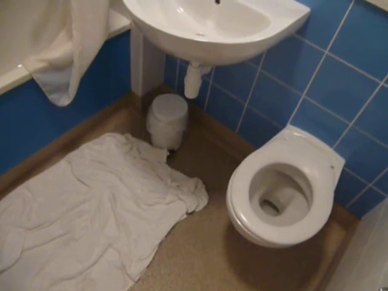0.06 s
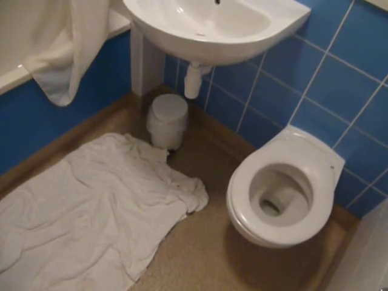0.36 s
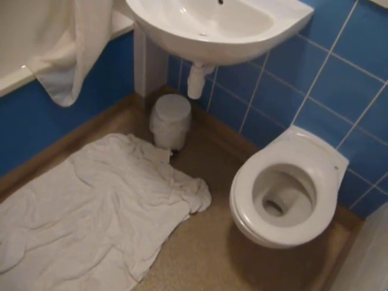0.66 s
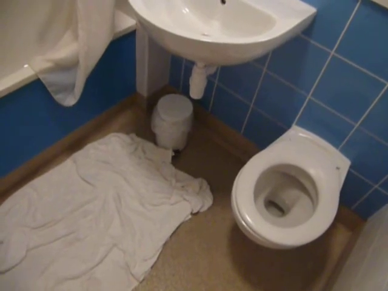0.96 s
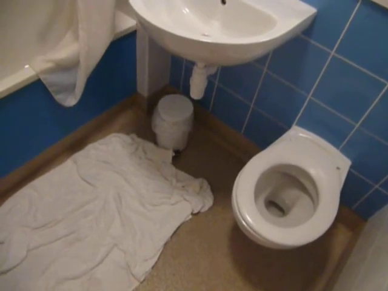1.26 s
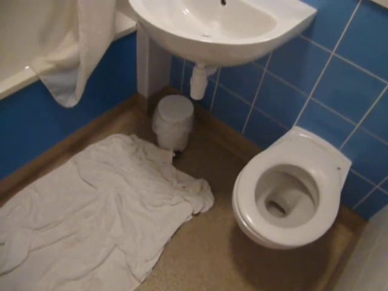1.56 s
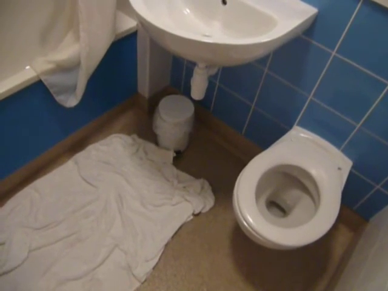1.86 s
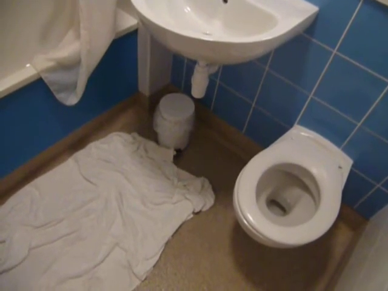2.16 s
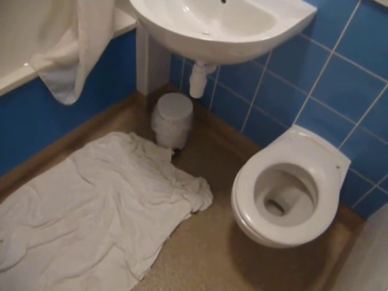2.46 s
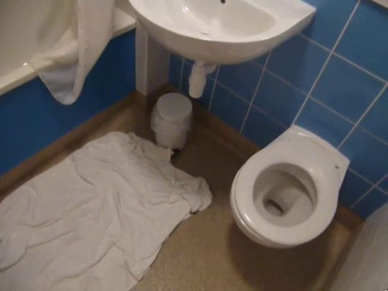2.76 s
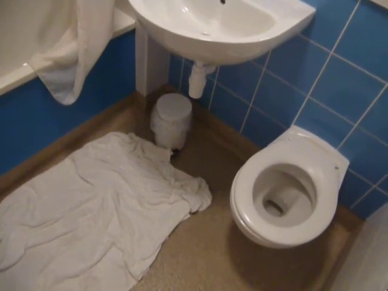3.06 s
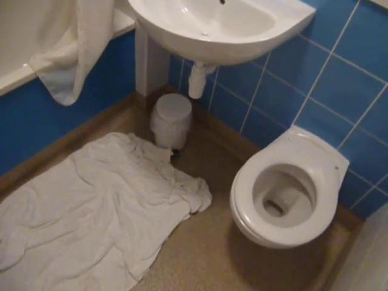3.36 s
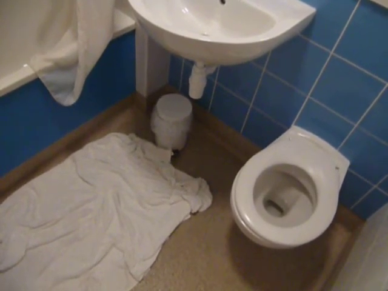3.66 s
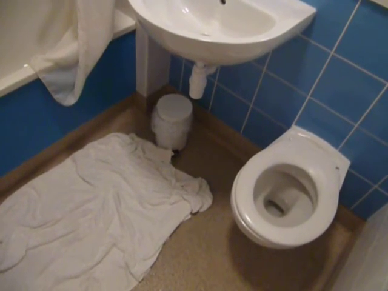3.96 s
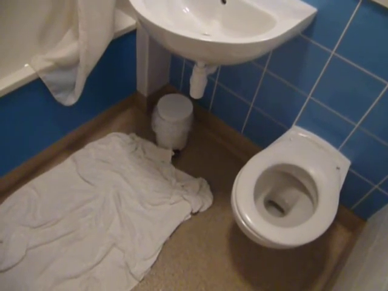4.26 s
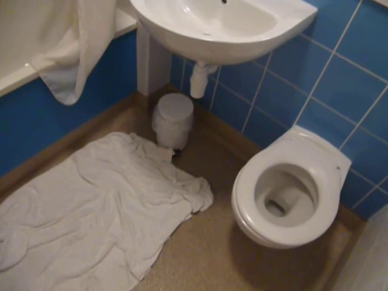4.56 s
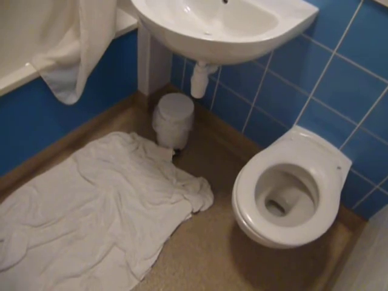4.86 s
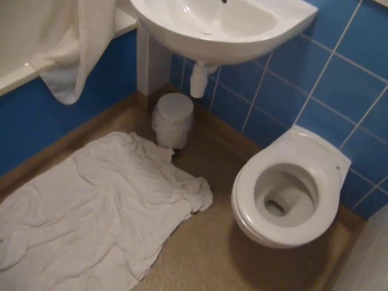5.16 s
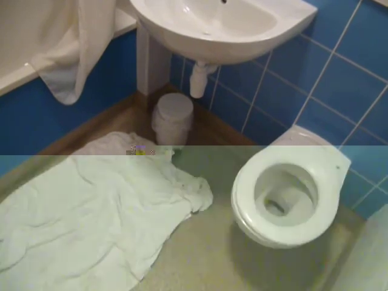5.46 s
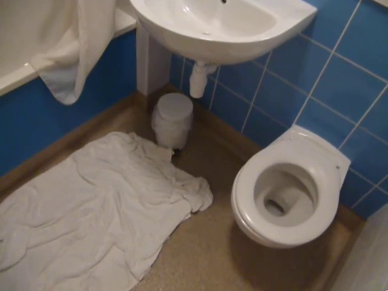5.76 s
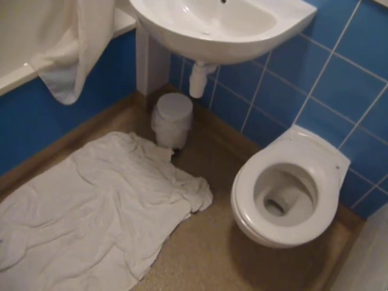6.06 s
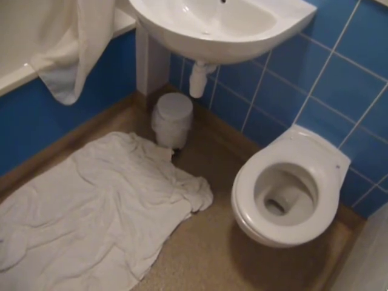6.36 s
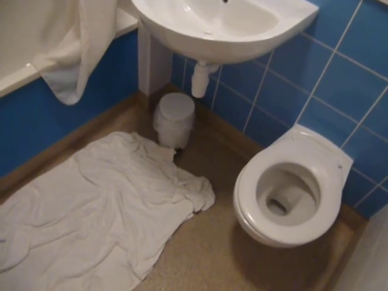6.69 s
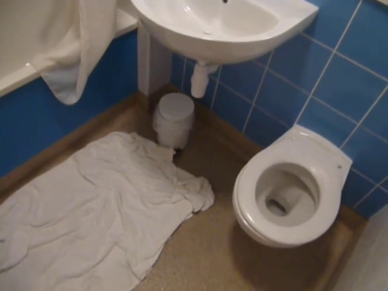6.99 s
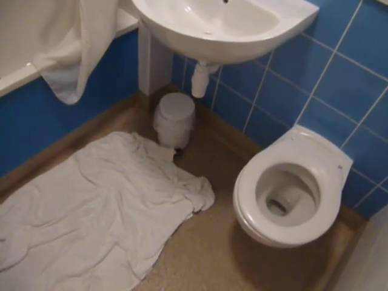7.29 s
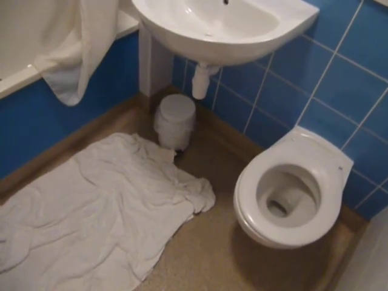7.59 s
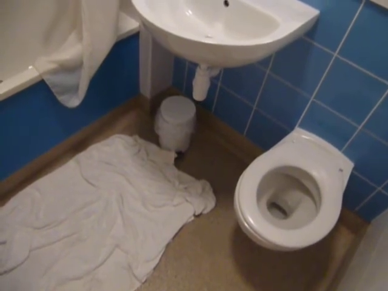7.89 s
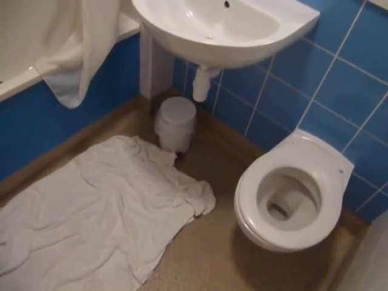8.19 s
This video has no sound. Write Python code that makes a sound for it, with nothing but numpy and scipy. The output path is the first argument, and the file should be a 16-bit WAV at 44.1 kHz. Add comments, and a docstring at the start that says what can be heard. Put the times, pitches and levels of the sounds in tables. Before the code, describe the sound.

In a small tiled bathroom, a pipe behind the wall gives a loud, steady low drone as the toilet cistern refills. It throbs gently and carries a buzz of overtones, with a light rattle and a faint hiss of water beneath. Near the end the buzz changes colour slightly and steadies while the drone goes on. One microphone picks it up inside the room.

```python
"""Chattering cistern valve

Heard from inside a small tiled bathroom: behind the wall, a water valve chatters about 80 times a
second as the toilet cistern refills. The pipe drones with a slow throb, buzzes and rattles in its
clips; the valve ticks and water hisses through it, over a faint hum. Near 7 s the valve settles into
a slightly slower stroke with other overtones."""
import sys
import numpy as np
from scipy import signal
from scipy.fft import rfft, irfft, next_fast_len
from scipy.io import wavfile
from scipy.ndimage import map_coordinates

SR = 44100
rng = np.random.default_rng(int(sys.argv[2]) if len(sys.argv) > 2 else 0)


def bounce(signal):
    """Save signal as a 16-bit WAV file at the path given by the first command-line argument."""
    frames = np.transpose(np.atleast_2d(signal))
    limited = np.clip(frames, -1, 1)
    pcm = np.round(limited * 32767).astype(np.int16)
    wavfile.write(sys.argv[1], SR, pcm)


N = 371763
TIME_S = np.arange(N) / SR

# The drone's two lowest partials. Each row: time in seconds, first and second level in dB before trim.
LOW_PARTIAL_LEVELS = [(0.1, -23.5, -24), (0.35, -24.5, -25), (1.46, -23, -24), (1.71, -25.5, -25.5),
                      (2.1, -24.5, -23.5), (2.55, -24.5, -26), (2.75, -24, -22.5), (5.16, -25.5, -24),
                      (8.23, -24, -23.5), (8.25, -24, -24.5)]
# The drone's third partial, fading now and then. Each row: time in seconds, level in dB before trim.
THIRD_PARTIAL_LEVELS = [(0.2, -28.5), (0.4, -27.5), (0.49, -38.5), (0.6, -31), (0.92, -32), (1.06, -50),
                        (1.24, -35), (1.51, -38), (1.57, -29), (1.8, -36), (1.98, -28.5), (4.76, -30),
                        (4.96, -36.5), (5.43, -36), (5.68, -30), (5.91, -40), (6.72, -31), (8.3, -34)]
# The pipe's overtones. Each row: multiple of the stroke rate, usual level in dB with the valve loose,
# usual level in dB once it has settled, roughness from 0 to 1 while loose.
PIPE_OVERTONES = [(4, -41.0, -33.5, 0.4), (5, -37.0, -39.5, 0.2), (6, -40.0, -35.5, 0.5),
                  (7, -38.0, -43.5, 0.4), (8, -43.5, -35.0, 0.6), (9, -47.5, -51.5, 0.3),
                  (10, -47.5, -52.5, 0.3), (11, -52.5, -55.0, 0.5), (12, -51.0, -61.5, 0.4),
                  (13, -53.5, -52.0, 0.6), (14, -39.5, -40.5, 0.1), (15, -50.5, -46.5, 0.2),
                  (16, -48.0, -52.0, 0.3), (17, -53.5, -58.0, 0.3), (18, -57.0, -60.5, 0.1),
                  (19, -64.0, -61.0, 0.6), (20, -59.5, -70.5, 0.3), (21, -58.5, -64.0, 0.3),
                  (22, -61.0, -55.5, 0.3), (23, -55.5, -59.5, 0.2), (24, -64.5, -60.0, 0.5),
                  (25, -69.5, -67.0, 0.4), (26, -60.5, -63.5, 0.2), (27, -62.0, -68.5, 0.2),
                  (28, -70.0, -73.0, 0.5), (29, -58.0, -61.5, 0.1), (30, -64.5, -67.0, 0.2),
                  (31, -69.5, -67.0, 0.4), (32, -61.5, -64.0, 0.2), (33, -72, -64, 0.4),
                  (34, -72, -73, 0.4), (35, -67.0, -68.5, 0.4), (36, -73, -78, 0.4),
                  (37, -64.0, -71.0, 0.4), (38, -67.0, -67.0, 0.5), (39, -73.0, -68.0, 0.4),
                  (49, -72.5, -69.5, 0.5), (52, -74.0, -75.5, 0.5), (56, -77.0, -75.5, 0.5),
                  (59, -76.0, -84.0, 0.5), (63, -76.5, -83.0, 0.5), (67, -69.5, -75.0, 0.4),
                  (69, -74.5, -78.5, 0.4)]
# Overtones that swell or sink as the third partial fades. Each row: multiple, dB gained per dB of fade.
OVERTONE_LEAN = [(4, -.9), (5, .75), (6, -.3), (14, .35)]
# Resonances of pipe and wall. Each row: frequency in Hz, nominal width in Hz, relative level in dB.
WALL_MODES = [(172, 22, -0.5), (206, 16, 0), (231.2, 12, -1), (256.6, 16, -2), (288.6, 10, -4.5),
              (303.6, 12, 3), (337.7, 10, -0.5), (371.4, 18, -6), (424, 22, -1), (446, 14, -4.5),
              (486, 21, -7), (567, 36, -6.5), (695, 24, -16.5), (842, 40, -10.5), (877, 24, -9),
              (916, 25, -12.5), (1026, 37, -18), (1105, 25, -12.5), (1220, 36, -18), (1312, 70, -15)]
# Colour of the valve's tick. Each row: frequency in Hz, relative level in dB.
TICK_SPECTRUM = [(2300, -24.5), (2620, 1), (2850, 0), (3200, 0.5), (3500, -4.5), (4000, 2), (4850, -9.5),
                 (5400, 4.5), (6200, -7.5), (6550, -2.5), (7000, -14.5), (8500, -35.5)]
# Colour of the water jet in the valve. Each row: frequency in Hz, relative level in dB.
JET_SPECTRUM = [(20, -15.5), (60, -8.5), (130, -1), (400, -3), (650, -7), (1300, -10.5), (1500, -16),
                (2300, -21.5), (2900, -25.5), (3400, -25), (5500, -28), (6200, -30.5), (6700, -29.5),
                (7600, -36), (8500, -48.5)]

SETTLE_AT_S, SETTLE_TAKES_S = 6.84, 0.22


def valve_stroke(rate_hz=79.68, hurry_hz_per_db=0.035, wander_hz=0.1303, settled_drop_hz=0.42):
    """Phase of the valve: it wanders and hurries a little while loose, then runs slower and steadier."""
    settled = settling()
    hurry = hurry_hz_per_db * third_fade_db() * (1 - settled)
    wander = wander_hz * (1 - 0.5 * settled) * wobble(8)
    return 2 * np.pi * np.cumsum(rate_hz + hurry + wander - settled_drop_hz * settled) / SR


def settling():
    """How far the valve has settled into its slower stroke, from 0 to 1."""
    return np.clip((TIME_S - SETTLE_AT_S) / SETTLE_TAKES_S, 0, 1)


def third_fade_db(limit_db=4):
    """How far the third partial lies under its usual level."""
    third_db, = curves(THIRD_PARTIAL_LEVELS)
    return np.clip(third_db.mean() - third_db, -limit_db, limit_db)


def pipe_drone(stroke, trims_db=(0.2, -0.16, 0.5), throb_hz=6.26, crest_s=0.057):
    """Three strong clean partials; a weaker vibration just under the second beats against it."""
    first_db, second_db = curves(LOW_PARTIAL_LEVELS)
    third_db = curves(THIRD_PARTIAL_LEVELS)[0] + wobble(24)  # flutters by about 1 dB
    beat = 2 * np.pi * throb_hz * (TIME_S - crest_s)
    easing = np.linspace(1, 0.58, N)  # the throb grows shallower
    octave = partial_phase(stroke, 2)
    first = amp(first_db) * (1 + 0.0558 * easing * np.cos(beat)) * np.cos(stroke)
    second = amp(second_db) * (np.cos(octave) + 0.2034 * easing * np.cos(octave - beat))
    third = amp(third_db) * np.cos(partial_phase(stroke, 3))
    return -np.sqrt(2) * sum(amp(db) * wave for db, wave in zip(trims_db, (first, second, third)))


def pipe_buzz(stroke, flutter_per_s=26, dip_db=-3.5, dip_half_width_s=0.1):
    """Overtones flutter as the strokes land unevenly, and less so once the valve has settled."""
    settled, fade_db = settling(), third_fade_db()
    buzz = np.zeros(N)
    for order, loose_db, settled_db, loose_roughness in PIPE_OVERTONES:
        roughness = loose_roughness * (1 - 0.4 * settled)
        scatter = rng.uniform(-np.pi, np.pi) * (order > 8)
        phase = partial_phase(stroke, order) + scatter  # short waves reach the microphone by many paths
        steady = np.sqrt(2 * (1 - roughness ** 2)) * np.cos(phase)
        flutter = wobble(flutter_per_s) * np.cos(phase) + wobble(flutter_per_s) * np.sin(phase)
        level_db = loose_db + settled * (settled_db - loose_db)
        lean_db = dict(OVERTONE_LEAN).get(order, 0) * fade_db
        drift_db = (0.6 + 2.5 * roughness) * (1 - 0.65 * settled) * wobble(6)
        buzz -= amp(level_db + lean_db + drift_db) * (steady + roughness * flutter)
    # the overtones dip while the valve changes its stroke
    dip = np.exp(-((TIME_S - SETTLE_AT_S) / dip_half_width_s) ** 2)
    return buzz * amp(dip_db * dip)


def partial_phase(stroke, order, dispersion=0.7):
    """Bending waves spread on their way along the pipe, so each partial arrives at its own time."""
    return order * stroke - dispersion * order * (order - 1)


def clip_rattle(stroke, level_db=-34, settled_change_db=-1.5, uneven_db=1.6):
    """The pipe knocks unevenly in its clips at every stroke and shakes the wall."""
    swell = np.exp(1.1 * np.cos(stroke - 2.2))  # one crest in every stroke
    knocks = unit(swell * rng.standard_normal(N)) * amp(uneven_db * wobble(14))
    return amp(level_db + settled_change_db * settling()) * ring(knocks, WALL_MODES)


def valve_ticks(stroke, level_db=-59, settled_change_db=-1, uneven_db=2.9, jitter_s=1e-5):
    """Each closing of the valve is a sharp metallic tick; the room blurs them into a fine sizzle."""
    turns = stroke / (2 * np.pi)
    closings = np.interp(np.arange(1, int(turns[-1])), turns, np.arange(N))
    closings += jitter_s * SR * rng.standard_normal(len(closings))
    strength = amp(uneven_db * rng.standard_normal(len(closings)))
    sample, late = closings.astype(int), closings % 1  # each tick is shared between two samples
    ticks = np.bincount(sample, strength * (1 - late), N + 1)
    ticks += np.bincount(sample + 1, strength * late, N + 1)
    return amp(level_db + settled_change_db * settling()) * shaped(tiled_room(ticks), TICK_SPECTRUM)


def water_jet(level_db=-40, easing_db=-1):
    """Water hisses steadily through the valve, easing a little as the cistern fills."""
    return amp(level_db + np.linspace(0, easing_db, N)) * shaped(rng.standard_normal(N), JET_SPECTRUM)


def faint_hum(hz=108, level_db=-49, waver_db=2.1):
    """A wavering hum in the background, between the two lowest partials."""
    phase = 2 * np.pi * hz * TIME_S + 0.5 * wobble(4)
    return np.sqrt(2) * amp(level_db + waver_db * wobble(2.6)) * np.sin(phase)


def tiled_room(ticks, t60_s=0.4):
    """Hard walls close around the microphone smear each tick into a short dense tail."""
    t = np.arange(SR // 3) / SR
    tail = amp(-60 * t / t60_s) * rng.standard_normal(len(t))
    return signal.fftconvolve(ticks, tail)[:N]


def ring(x, modes):
    """x through a set of steep resonances, at rms 1."""
    def response(f):
        peaks = (amp(db) / (1 + ((f - hz) / (0.67 * width)) ** 2) for hz, width, db in modes)
        return np.sqrt(sum(peak ** 2 for peak in peaks))
    return unit(filtered(x, response))


def shaped(x, spectrum):
    """x coloured by (Hz, dB) points joined on a log frequency axis, at rms 1."""
    hz, db = np.transpose(spectrum)
    return unit(filtered(x, lambda f: amp(np.interp(np.log(f + 1), np.log(hz + 1), db))))


def filtered(x, response):
    """x through a gain given as a function of frequency in Hz."""
    size = next_fast_len(N + SR // 2)
    return irfft(rfft(x, size) * response(np.fft.rfftfreq(size, 1 / SR)), size)[:N]


def wobble(knots_per_s, hop=32):
    """A smooth random curve of rms 1."""
    at = np.arange(0, N + hop, hop)
    knots = rng.standard_normal(4096)
    coarse = map_coordinates(knots, [at * knots_per_s / SR], mode="wrap")
    return unit(np.interp(np.arange(N), at, coarse))


def curves(rows):
    """One value per sample for each column after the time."""
    times, *columns = np.transpose(rows)
    return [np.interp(TIME_S, times, column) for column in columns]


def amp(db):
    return 10 ** (np.asarray(db) / 20)


def unit(x):
    return x / np.sqrt(np.mean(np.abs(x) ** 2) + 1e-20)


def scene():
    """Behind the wall, one valve drives drone, buzz, rattle and ticks; hiss and hum lie underneath."""
    stroke = valve_stroke()
    pipe = pipe_drone(stroke) + pipe_buzz(stroke) + clip_rattle(stroke)
    return (pipe + valve_ticks(stroke) + water_jet() + faint_hum())[None]


def record(dry, top_hz=8600):
    """One microphone in the bathroom; nothing above the band limit comes through."""
    return np.array([filtered(channel, lambda hz: hz < top_hz) for channel in dry])


dry = scene()
out = record(dry)
bounce(out)
```